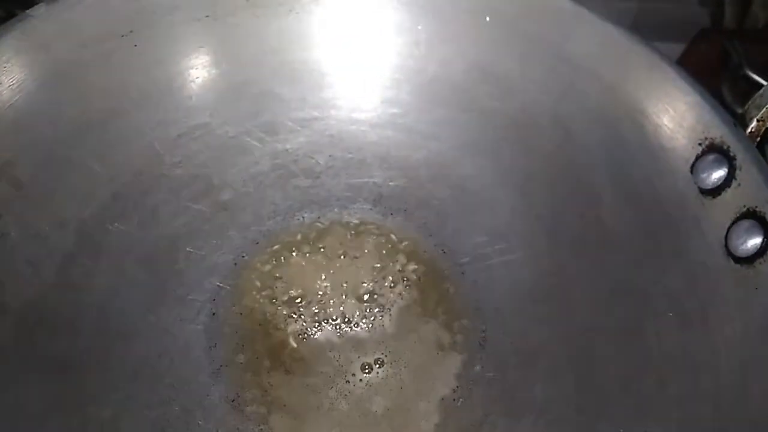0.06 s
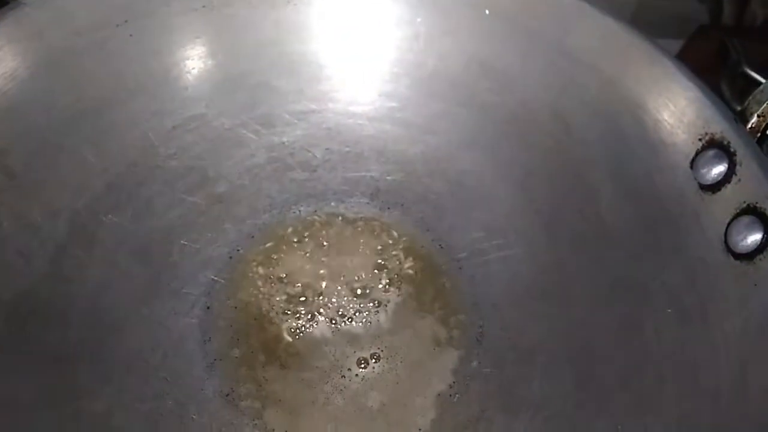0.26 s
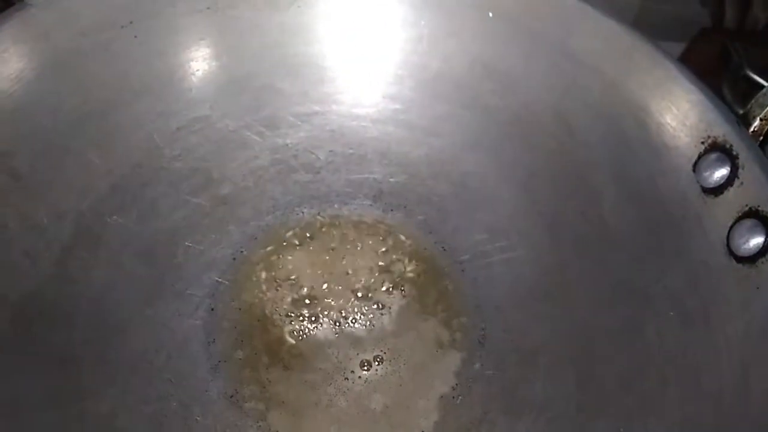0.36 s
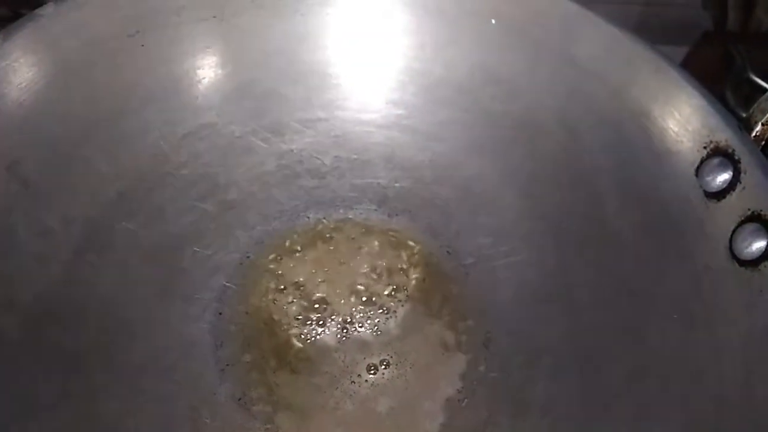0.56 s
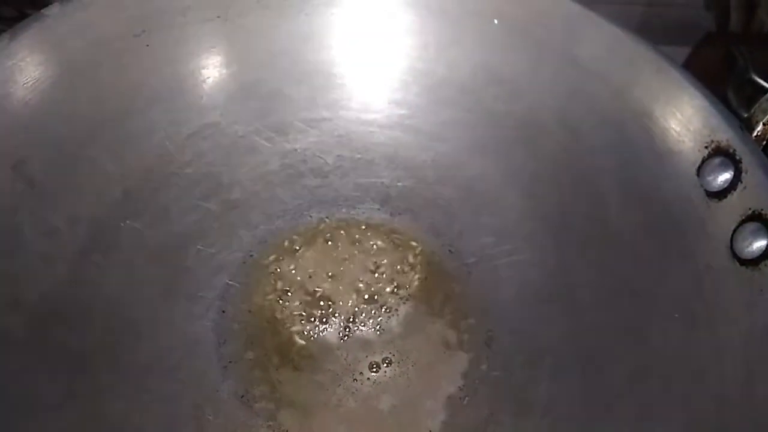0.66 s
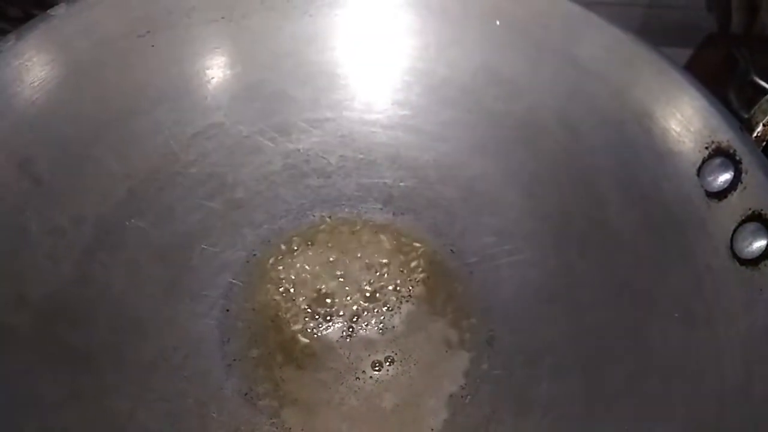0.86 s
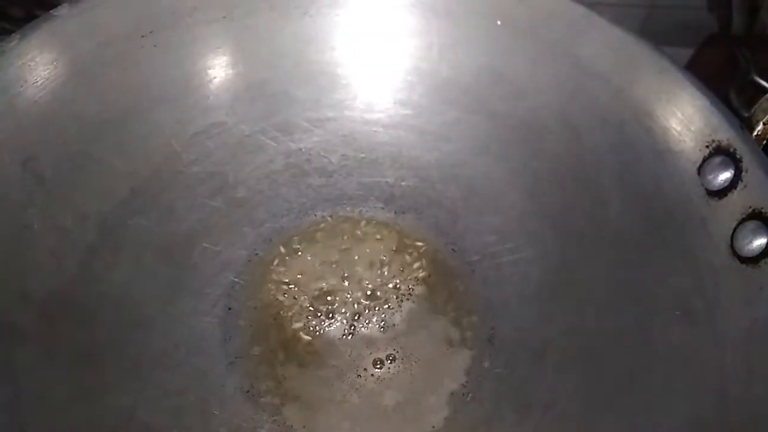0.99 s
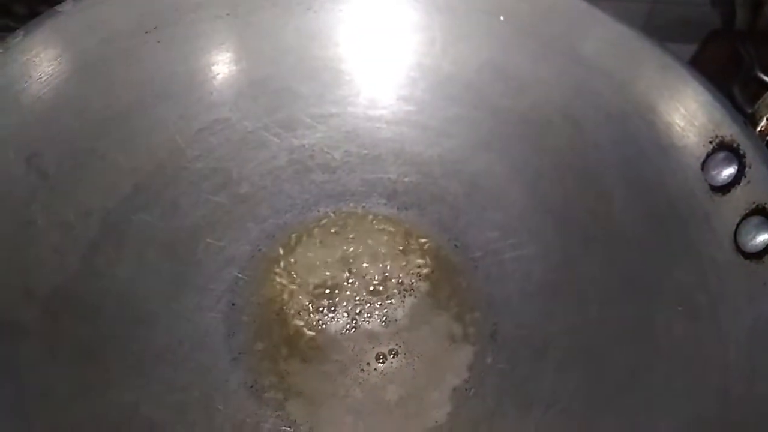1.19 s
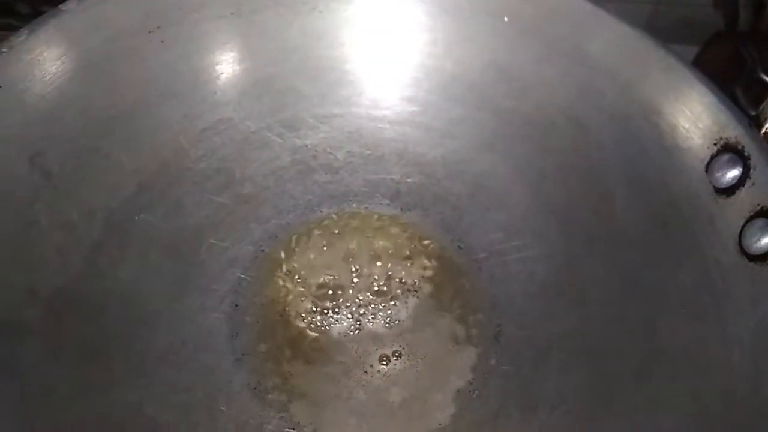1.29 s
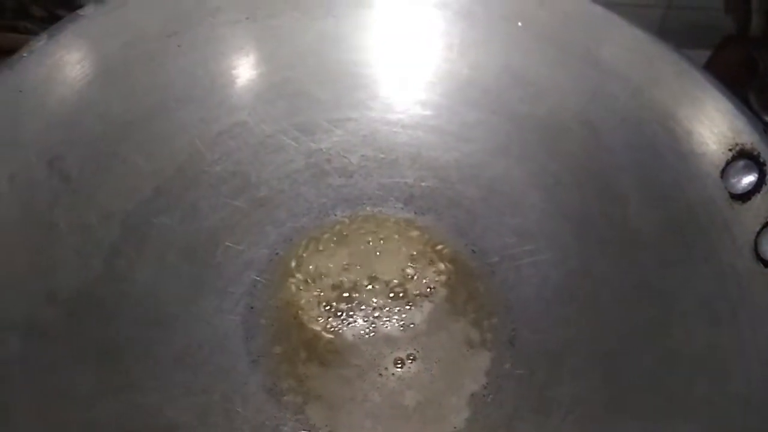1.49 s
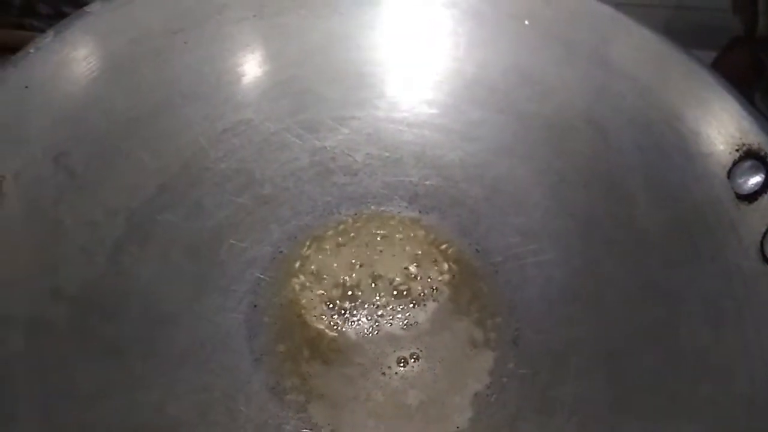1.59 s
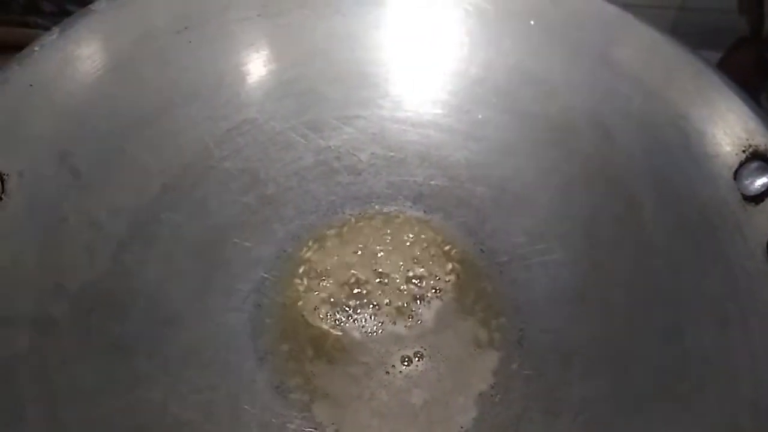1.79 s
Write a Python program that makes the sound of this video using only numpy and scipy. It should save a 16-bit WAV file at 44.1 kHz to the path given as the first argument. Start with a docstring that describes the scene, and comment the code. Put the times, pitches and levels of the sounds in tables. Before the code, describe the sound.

Close, crisp pops of seeds bursting in hot fat over a faint sizzle in a small kitchen. A short metallic knock and light rattle come from the pan, then the sizzle fades and the popping continues more quietly.

```python
"""Spice seeds pop in hot ghee in a steel pan, close to the microphone in a small kitchen.
Each pop is a tiny burst that bounces around the bowl of the pan, then into the room.
Something knocks and rattles on the pan; two soft thuds swell in the bass.
A thin sizzle of steam bubbles dies away after about a second. Faint hiss and rumble underneath."""
import sys
import numpy as np
from scipy import signal
from scipy.fft import rfft, irfft, next_fast_len
from scipy.io import wavfile

SR = 44100
rng = np.random.default_rng(int(sys.argv[2]) if len(sys.argv) > 2 else 0)


def dump_mix(stems):
    """Bounce the given channels to the path in sys.argv[1] as a 16-bit WAV at rate SR."""
    frames = np.atleast_2d(stems).T  # one column per channel
    limited = np.clip(frames, -1, 1)  # hard clip at full scale
    pcm = np.round(limited * 32767).astype(np.int16)
    wavfile.write(sys.argv[1], SR, pcm)


N = 81585

# seed bursts (time [s], level [dB], pitch [Hz], width [oct], crack [dB], room [dB], right side [dB])
SEED_POPS = [(0.2013, -9, 7180, 0.28, -32, -6.5, -4.5), (0.2122, -10, 10460, 0.3, -41, -7, 1),
             (0.2248, -27.5, 1910, 0.38, 2.5, -5, 3), (0.2422, -20, 7940, 0.24, -30, -18, 3),
             (0.2698, -7.5, 7940, 0.21, -28.5, -6.5, -2.5), (0.4694, 1, 7270, 0.24, -9, -3, 3),
             (0.47, -24, 720, .55, -9, -16, -9), (.5875, -26, 9000, 0.11, -42, -10, 1),
             (0.6797, -13, 8300, 0.11, -19, -2, -0.5), (0.6843, -4.5, 7800, 0.24, -28, -2.5, -1),
             (0.6875, -19, 12250, 0.16, -31, 3, 4), (0.7698, -5.5, 6100, .31, -16, -4, 0.5),
             (0.8571, -16, 6800, .21, -26, -4.5, 1), (1.081, -34.5, 13500, 0.16, -22.5, 6, 5.5),
             (1.0816, -28.5, 8900, 0.13, -31, -6, 0.5), (1.4723, -16.5, 8700, 0.17, -31, -2, 0.5),
             (1.476, -28.5, 11800, .17, -27, 3, 5.5), (1.5227, -18.5, 7250, 0.3, -20, 2.5, -2),
             (1.5753, -13.5, 7330, 0.32, -29.5, 0, 3.5), (1.575, -16, 3180, 0.67, -6.5, -9, -1.5),
             (1.5979, -22.5, 8200, .2, -25.5, -4, -1), (1.7946, -30, 9300, .55, -12.5, -4, 3.5)]
# broad crack of a seed (frequency [Hz], level [dB])
CRACK_SPECTRUM = [(100, -28), (600, -16), (1200, -17), (2200, 0), (3800, -3), (6000, -3), (10000, -5),
                  (15000, -23.5)]
# knocks on the pan (time [s], level [dB], body [dB], room [dB])
PAN_KNOCKS = [(0.6836, -1.5, -21, -2.5), (0.6871, -1.5, -17.5, -2.5), (.7300, -18, -19, 9),
              (.8860, -24, -8.5, 1), (0.95, -22.5, -13.5, 0.5), (1.0003, -34.5, -8, 3.5),
              (1.0816, -24.5, -8.5, 7), (1.1350, -29, -2.5, -18)]
# clang of a knock (frequency [Hz], level [dB])
CLANG_SPECTRUM = [(300, -38.5), (1000, -17), (1500, -15), (1850, -2), (2400, -2.5), (2900, -14.5),
                  (3500, -24), (4700, -35), (6000, -31), (15000, -50.5)]
# dull body of a knock (frequency [Hz], level [dB])
BODY_SPECTRUM = [(100, -19), (230, -16), (310, 1.5), (550, 0), (800, -5), (1200, -8), (1700, -21.5),
                 (3500, -36.5)]
# pan modes (frequency [Hz])
PAN_MODES_HZ = [314, 607, 965, 1190, 1290, 1426, 1698, 1733, 1789, 1862, 2008, 2039, 2066, 2169, 2238, 2291,
                2350, 2630]
# pan mode strengths (level [dB])
PAN_MODES_DB = [-13.5, -17, -12.5, -11, -6.5, -9, -7.5, -2, -2, -4.5, 7.5, 0.5, 7, -6, -3.5, -7.5, -1,
                -10.5]
# bass thuds (peak time [s], level [dB], rise constant [s], fall constant [s])
BASS_THUDS = [(.750, -44, 0.027, 0.037), (1.598, -44, 0.035, 0.035)]
# sizzle envelope (time [s], level [dB])
SIZZLE_ENVELOPE = [(0, -45.5), (.17, -47.5), (.33, -45.5), (.45, -48), (.62, -43), (.68, -49.5), (.8, -46),
                   (.89, -48), (.94, -60.5), (1.05, -65.5), (1.85, -69)]
# bubble bursts (frequency [Hz], level [dB])
SIZZLE_SPECTRUM = [(500, -50.5), (1300, -38.5), (2100, -23.5), (3300, -22.5), (4700, -27.5), (5200, -8.5),
                   (6800, -5.5), (8300, 2.5), (9300, -3), (10800, -13.5), (13000, -21.5), (16000, -36)]
# steady hiss (frequency [Hz], level [dB])
HISS_SPECTRUM = [(30, -0.5), (80, -5.5), (200, -15.5), (600, -16.5), (1400, -15.5), (2050, -2),
                 (2800, -1.5), (4300, -1), (6500, 0), (8400, 5), (10500, -0.5), (13000, -6.5),
                 (16000, -17.5)]
# rumble envelope (time [s], level [dB])
RUMBLE_ENVELOPE = [(0, -65.5), (.15, -70), (.22, -80.5), (.42, -84), (.5, -71), (.65, -75), (.76, -50.5),
                   (.87, -69.5), (.97, -66.5), (1.05, -81), (1.43, -93.5), (1.5, -67.5), (1.6, -53),
                   (1.7, -72.5), (1.85, -67.5)]
# low rumble (frequency [Hz], level [dB])
RUMBLE_SPECTRUM = [(20, -11), (55, -10.5), (78, 0), (105, -7), (145, -8), (220, -21), (500, -33),
                   (1500, -55.5)]
# kitchen decay (frequency [Hz], T60 [s])
KITCHEN_T60 = [(200, 0.41), (2000, 0.27), (7000, 0.29), (11000, 0.38), (15000, 0.083)]
# right channel response re left (frequency [Hz], gain [dB])
RIGHT_RESPONSE = [(80, -7.5), (600, -6), (1200, -3.5), (2100, -13.5), (4000, -12.5), (5500, -12.5),
                  (6800, -16), (8300, -10), (10200, -3), (13000, -6.5), (16000, -4)]


def seed_pops(husk_t60_s=0.003, wall_delay_s=0.00094, wall_db=1.5, bowl_t60_s=0.034, bowl_db=-1):
    """Husks split: pitched snap plus broad crack, echoed by far pan wall, bowl and room."""
    out = np.zeros((2, N))
    for time_s, level_db, pitch_hz, width_oct, crack_db, room_db, right_db in SEED_POPS:
        def spectrum_db(hz):
            snap = norm(np.exp(-0.5 * (np.log2((hz + 1) / pitch_hz) / width_oct) ** 2))
            crack = amp(crack_db) * norm(amp(at_hz(CRACK_SPECTRUM, hz)))
            return 10 * np.log10(snap ** 2 + crack ** 2)

        burst = click(spectrum_db)
        split = scatter(husk_t60_s)
        split[:, 0] += 1
        wall = amp(wall_db) * np.roll(split, round(wall_delay_s * SR), axis=1)
        direct = norm(convolve(burst, split + wall))
        echoes = convolve(burst, amp(bowl_db) * scatter(bowl_t60_s) + amp(room_db) * kitchen())
        add(out, time_s, amp(level_db) * balance(right_db) * (direct + echoes))
    return out


def pan_knocks(clang_t60_s=0.05, ring_t60_s=0.29, ring_db=-1.5):
    """Struck steel: short clang, dull body, longer modal ring."""
    out = np.zeros((2, N))
    t = np.arange(SR // 2) / SR
    clang = click(lambda hz: at_hz(CLANG_SPECTRUM, hz))
    body = click(lambda hz: at_hz(BODY_SPECTRUM, hz))
    for time_s, level_db, body_db, room_db in PAN_KNOCKS:
        for tone in (clang, amp(body_db) * body):
            response = scatter(clang_t60_s) + amp(room_db) * kitchen()
            add(out, time_s, amp(level_db) * convolve(tone, response))
        modes = 0
        for hz, mode_db in zip(PAN_MODES_HZ, PAN_MODES_DB):
            gain = amp(mode_db + rng.normal(0, 2))
            modes += gain * np.sin(2 * np.pi * (hz * t + rng.random((2, 1))))
        ring = norm(modes * amp(-60 * t / ring_t60_s))
        add(out, time_s, amp(level_db + ring_db) * ring)
    return out


def air_puff(time_s=0.4685, level_db=-39, decay_s=0.00295):
    """Air pushed out by the biggest pop."""
    age = np.maximum(np.arange(N) / SR - time_s, 0) / decay_s
    return amp(level_db) * age * (2 - age) * np.exp(-age)


def thuds(low_hz=73.6, upper_hz=137, upper_db=-15.5):
    """Two bass notes that swell and fade."""
    out = np.zeros(N)
    for peak_s, level_db, rise_s, fall_s in BASS_THUDS:
        t = np.arange(N) / SR - peak_s
        note = np.cos(2 * np.pi * low_hz * t) + amp(upper_db) * np.cos(2 * np.pi * upper_hz * t)
        swell = np.exp(np.minimum(t / rise_s, -t / fall_s))
        out += amp(level_db) * swell * note
    return out


def sizzle(bubbles_per_s=5000, spread_db=1.5):
    """Tiny steam bubbles burst at random, mostly on the left."""
    shape = (2, N)
    onsets = rng.random(shape) < bubbles_per_s / SR
    polarity = rng.choice([-1, 1], shape)
    bursts = onsets * polarity * amp(spread_db * rng.standard_normal(shape))
    return coloured(bursts, SIZZLE_SPECTRUM) * envelope(SIZZLE_ENVELOPE) * balance(right_db=-3.5)


def background(hiss_db=-65.5):
    """Steady faint hiss, uneven low rumble."""
    hiss = amp(hiss_db) * coloured(rng.standard_normal((2, N)), HISS_SPECTRUM) * balance(right_db=4)
    rumble = envelope(RUMBLE_ENVELOPE) * coloured(rng.standard_normal(N), RUMBLE_SPECTRUM)
    return hiss + rumble


def kitchen(delay_s=0.004):
    """Stereo room response; the top treble dies first."""
    hz, t, noise = signal.stft(rng.standard_normal((2, SR // 2)), SR, nperseg=256)
    decay = amp(-60 * t / at_hz(KITCHEN_T60, hz)[:, None])
    _, tail = signal.istft(noise * decay, SR, nperseg=256)
    delayed = np.pad(tail, ((0, 0), (round(delay_s * SR), 0)))
    return norm(delayed[:, :SR // 2])


def scatter(t60_s):
    """Dense stereo reflections, exponential decay."""
    t = np.arange(SR // 2) / SR
    return norm(rng.standard_normal((2, len(t))) * amp(-60 * t / t60_s))


def click(spectrum_db, size=2048):
    """Minimum-phase click with this spectrum, energy 1."""
    magnitude = amp(spectrum_db(np.fft.rfftfreq(size, 1 / SR)))
    cepstrum = irfft(np.log(np.maximum(magnitude, 1e-5)))
    cepstrum[1:size // 2] *= 2
    cepstrum[size // 2 + 1:] = 0
    return norm(irfft(np.exp(rfft(cepstrum))))


def amp(db):
    """dB to gain."""
    return 10 ** (np.asarray(db) / 20)


def balance(right_db):
    """Stereo gains, left at unity."""
    return amp([[0], [right_db]])


def norm(x):
    """Energy 1 per channel."""
    return x / np.sqrt(np.sum(x ** 2, axis=-1, keepdims=True) + 1e-20)


def at_hz(table, hz):
    """Table lookup on a log frequency axis."""
    table_hz, values = np.transpose(table)
    return np.interp(np.log(hz + 1), np.log(table_hz + 1), values)


def envelope(table):
    """(time [s], level [dB]) rows to gain per sample."""
    return amp(np.interp(np.arange(N) / SR, *np.transpose(table)))


def filtered(x, gain):
    """Zero-phase filter by gain(hz)."""
    size = next_fast_len(N + SR // 2)
    return irfft(rfft(x, size) * gain(np.fft.rfftfreq(size, 1 / SR)), size)[..., :N]


def coloured(x, spectrum):
    """x shaped by a spectrum table, rms 1."""
    shaped = filtered(x, lambda hz: amp(at_hz(spectrum, hz)))
    return shaped / np.sqrt(np.mean(shaped ** 2) + 1e-20)


def convolve(x, response):
    """x through a stereo response."""
    return signal.fftconvolve(np.atleast_2d(x), response, axes=1)


def add(out, time_s, x):
    """Mix x into out at time_s."""
    part = out[:, round(time_s * SR):][:, :x.shape[-1]]
    part += x[..., :part.shape[1]]


def scene():
    """Sum at the microphone."""
    return seed_pops() + pan_knocks() + air_puff() + thuds() + sizzle() + background()


def record(dry):
    """Right side weaker and coloured; both sides band-limited."""
    top_hz = 16000
    return filtered(dry, lambda hz: amp([np.zeros_like(hz), at_hz(RIGHT_RESPONSE, hz)]) * (hz < top_hz))


dry = scene()
out = record(dry)
dump_mix(out)
```